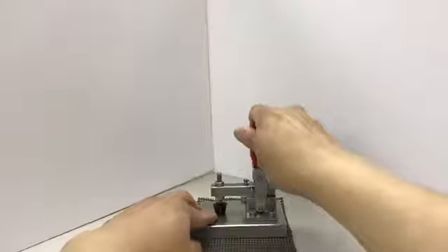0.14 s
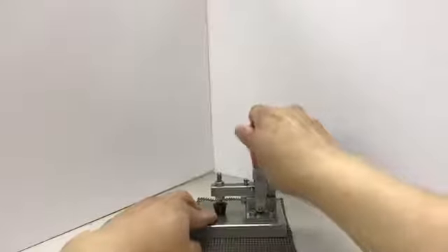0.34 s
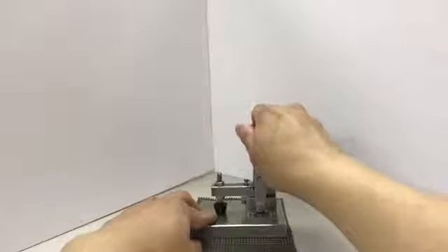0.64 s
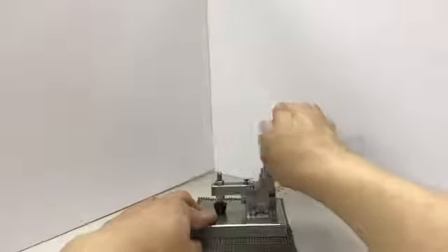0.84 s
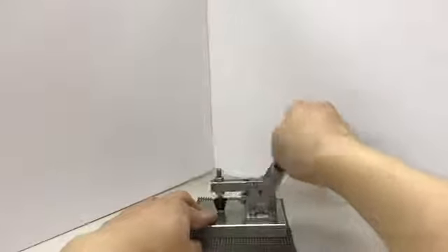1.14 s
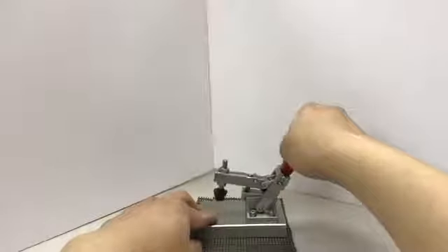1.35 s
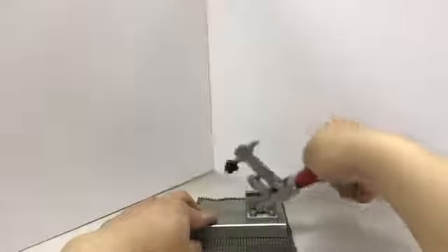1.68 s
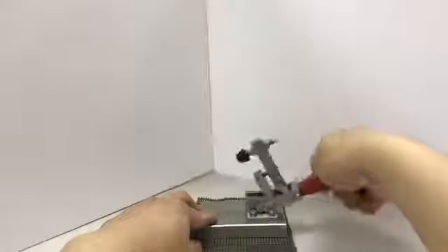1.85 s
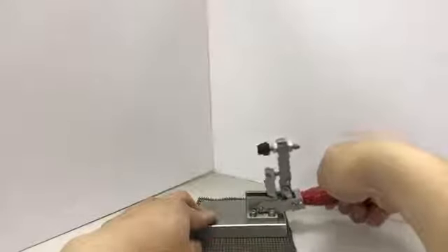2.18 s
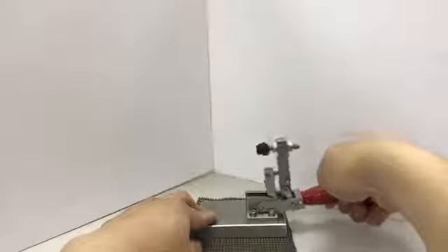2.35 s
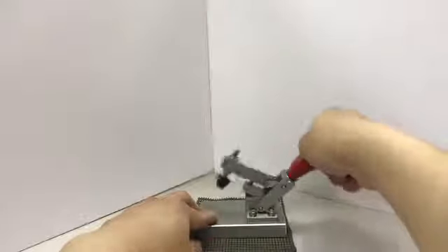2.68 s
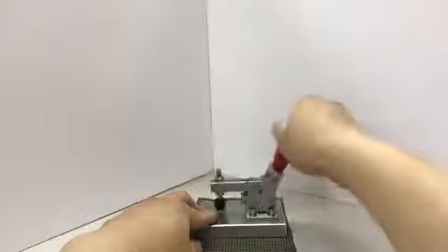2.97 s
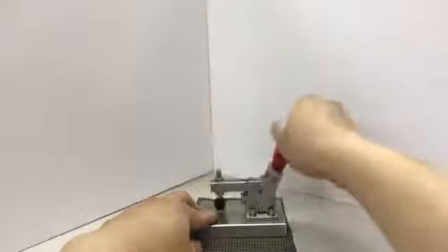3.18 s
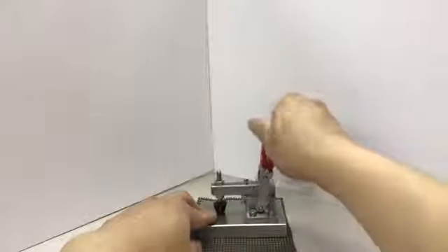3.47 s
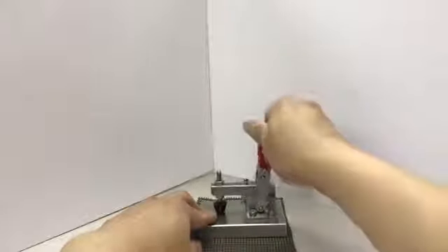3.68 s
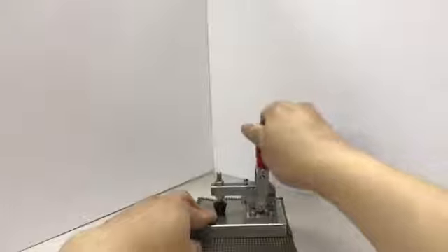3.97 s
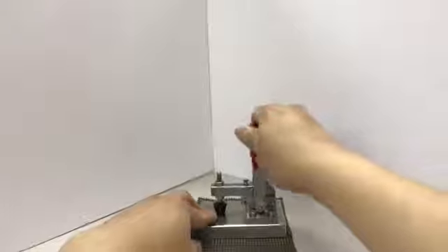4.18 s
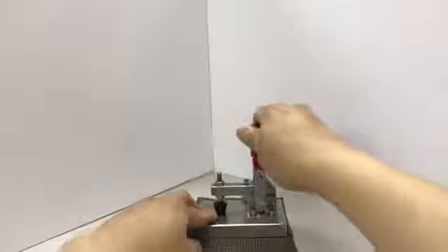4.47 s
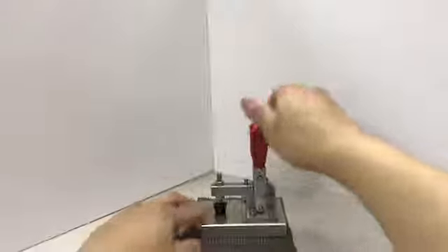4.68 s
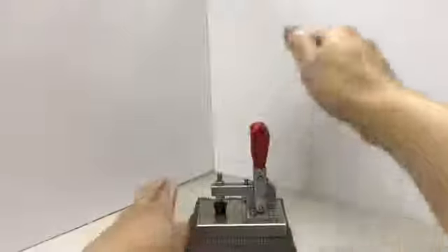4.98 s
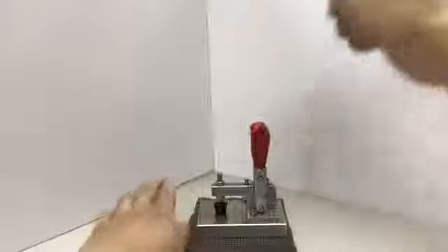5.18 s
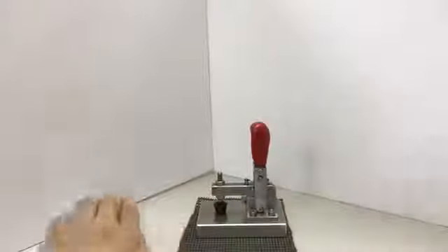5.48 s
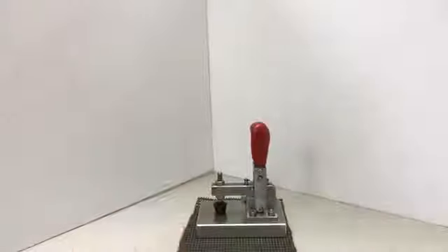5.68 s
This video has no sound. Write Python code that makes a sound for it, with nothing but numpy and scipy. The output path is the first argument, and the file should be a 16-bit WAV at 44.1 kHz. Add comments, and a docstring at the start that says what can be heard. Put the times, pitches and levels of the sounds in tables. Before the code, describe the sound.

A steel toggle clamp on a metal base snaps loudly, creaks and knocks as its handle swings, then snaps shut hard in a quiet room.

```python
"""In the corner of a small room, a steel toggle clamp on a metal base is worked by hand on a table.
It snaps open, the handle is swung back and forth with small knocks and ticks, and it snaps shut over centre.
Blows ring damped modes of base and table, with echoes and a diffuse tail; bright modes and a crack make the ticks.
Dry pivots drag in uneven slips and squeak as narrow noise; at the end the arms withdraw with a soft rustle.
Cloth and the still air of the room are shaped noise."""
import sys
import numpy as np
from scipy import signal
from scipy.fft import rfft, irfft
from scipy.io import wavfile

SR = 44100
rng = np.random.default_rng(int(sys.argv[2]) if len(sys.argv) > 2 else 0)


def dump(signal):
    """Clip the signal to [-1, 1] and save it as 16-bit WAV at the path in sys.argv[1]."""
    limited = np.clip(np.atleast_2d(signal).T, -1, 1)
    pcm = np.round(limited * 32767).astype(np.int16)
    wavfile.write(sys.argv[1], SR, pcm)


N = 257524
TIME = np.arange(N) / SR


def amp(db):
    """Turns decibels into a linear gain."""
    return 10 ** (np.asarray(db) / 20)


def evened(x):
    """Scales a sound to an rms of 1."""
    return x / np.sqrt(np.mean(x ** 2) + 1e-20)


def peaked(x):
    """Scales a sound to a peak of 1."""
    return x / abs(x).max()


def read(points, hz):
    """Joins (Hz, value) points on a log-frequency axis."""
    point_hz, value = np.transpose(points)
    return np.interp(np.log(hz + 1), np.log(point_hz + 1), value)


def add(mix, start_s, sound):
    """Mixes a sound in at its start time, cut off at the end of the scene."""
    part = mix[round(start_s * SR):][:len(sound)]
    part += sound[:len(part)]


def lowpass(x, hz, order=1):
    """Dulls a sound above a corner frequency."""
    return signal.sosfilt(signal.butter(order, min(hz, SR / 2 - 1), fs=SR, output="sos"), x)


def noise(spectrum):
    """Noise of rms 1 whose spectrum follows the given curve."""
    gain = amp(read(spectrum, np.fft.rfftfreq(N, 1 / SR)))
    return evened(irfft(rfft(rng.standard_normal(N)) * gain, N))


def ring(modes, t):
    """Sums decaying sines, one per mode; neighbours in the list start in opposite directions."""
    sound = 0
    for k, (hz, db, t60) in enumerate(modes):
        decay = np.exp(-np.log(1000) * t / t60)
        sound = sound + (-1) ** k * amp(db) * decay * np.sin(2 * np.pi * hz * t)
    return sound


def swell(start_s, hold_s, rise_s, fall_s):
    """The gain of one movement: full for hold_s; rise_s and fall_s are the times for a tenfold change."""
    early = np.maximum(start_s - TIME, 0)
    late = np.maximum(TIME - start_s - hold_s, 0)
    return np.exp(-np.log(10) * (early / rise_s + late / fall_s))


# The still room's tone. Each row: frequency in Hz, relative level in dB.
AIR_SPECTRUM = [(19, -27), (32, -2), (54, -3.5), (71, -5.5), (142, -1), (175, -6.5), (209, -4), (264, -13),
                (300, -16), (398, -13), (430, -27.5), (1200, -27), (1300, -28), (1440, -31), (15000, -45)]


def still_air(level_db=-56):
    """The quiet room under everything: steady noise, mostly low."""
    return amp(level_db) * noise(AIR_SPECTRUM)


# How long the diffuse room lasts. Each row: frequency in Hz, decay by 60 dB in seconds.
ROOM_DECAY_TIMES = [(100, 0.46), (400, 0.28), (800, 0.33), (2000, 0.3), (5000, 0.2), (14000, .15)]


def room(spectrum, build_s=0.007, bass_build_s=0.0088, bass_hz=450):
    """A diffuse tail that dies at its own speed in each band; the sparse bass modes take longest to build."""
    hz, t, grains = signal.stft(rng.standard_normal(SR), SR, nperseg=512)
    t60 = read(ROOM_DECAY_TIMES, hz)[:, None]
    decay = np.exp(-np.log(1000) * t / t60)
    decay = decay * np.sqrt(2 * np.log(1000) / (t60 * SR))  # unit energy in every band
    band_build_s = build_s + bass_build_s / (1 + (hz[:, None] / bass_hz) ** 4)
    build = 1 - np.exp(-(t / band_build_s) ** 2)
    colour = amp(read(spectrum, hz))[:, None]
    return signal.istft(grains * decay * build * colour, SR, nperseg=512)[1][:SR]


# Bending modes of the base on the table. Each row: frequency in Hz, relative level in dB, 60 dB decay in seconds.
BASE_MODES = [(80, -26, .2), (127, -6.5, .044), (180, 4.7, .031), (248, 5.8, .019), (343, .8, .008),
              (356, -10.4, .129), (390, -18, .16), (539, -2.9, .008), (558, -2, .016), (1035, -14.5, .011),
              (1945, -24.7, .012)]
# Higher modes of the base plate. Each row: frequency in Hz, relative level in dB, 60 dB decay in seconds.
PLATE_MODES = [(820, -28, 0.085), (905, -26.5, 0.057), (1280, -27.5, 0.041), (1630, -36, 0.052)]
# Reflections from table and walls. Each row: delay in seconds, gain at low frequencies.
EARLY_ECHOES = [(0.00266, 0.8), (0.00666, 0.48), (0.00952, 0.4), (0.01665, 0.09), (0.02482, 0.13),
                (0.03713, 0.16), (0.04537, 0.08)]
# The diffuse room after a blow on the base. Each row: frequency in Hz, relative level in dB.
BLOW_ROOM = [(80, 9.5), (160, 19.5), (300, 26.5), (400, 34), (520, 15), (650, 22), (850, 20.5),
             (1000, 12.5), (1200, 3.5), (1400, 0), (1900, -1.5), (2400, -12.5), (4000, -14.5),
             (7000, -33.5)]
# The room's standing wave: frequency in Hz, relative level in dB, 60 dB decay in seconds.
STANDING_WAVE = (140, -26.5, .47)


def thump(echo_hz=900):
    """The base's answer to one sharp blow, with dull early reflections, the standing wave and the diffuse tail."""
    t = np.arange(SR) / SR
    hz = np.fft.rfftfreq(SR, 1 / SR)
    echoes = sum(gain * np.exp(-2j * np.pi * hz * delay) for delay, gain in EARLY_ECHOES)
    echoes = echoes / (1 + (hz / echo_hz) ** 2)  # each echo is duller than the blow
    base = irfft(rfft(ring(BASE_MODES, t)) * (1 + echoes), SR)
    sound = base + ring(PLATE_MODES, t) + ring([STANDING_WAVE], t) + room(BLOW_ROOM)
    return sound[:SR * 3 // 4]


# Slow modes of the table under a heavy push.
# Each row: frequency in Hz, relative level in dB, 60 dB decay in seconds.
TABLE_MODES = [(61.6, -3.5, 0.037), (93, -0.5, 0.11), (141.8, -1.5, 0.06)]


def blows(rows, body):
    """Softer contacts last longer and so wake fewer of the high modes; heavy ones also rock the table."""
    out = np.zeros(N)
    sway = peaked(ring(TABLE_MODES, np.arange(len(body)) / SR))
    for start_s, peak_db, hard_hz, sway_db in rows:
        blow = peaked(lowpass(body, hard_hz, order=2))
        add(out, start_s, amp(peak_db) * blow + amp(sway_db) * sway)
    return out


# The linkage snapping over centre. Each row: start in seconds, peak of the blow in dB,
# hardness as the corner of the blow's spectrum in Hz, peak of the table sway in dB.
SNAP_BLOWS = [(.17105, -5.5, 3990, -23.5), (4.2808, -1.77, 3510, -45)]


def snaps(body):
    """The linkage snaps over centre and thumps base and table with a hard blow."""
    return blows(SNAP_BLOWS, body)


# Steel meeting steel. Each row: start in seconds, peak of the direct sound in dB, tilt in dB per octave
# (well above 2 kHz), pitch of the struck part in Hz, relative level of its ring in dB.
STEEL_TICKS = [(0.171, -26.5, -11.5, 1900, 5.5), (.587, -57, 5, 1880, 17), (0.9352, -38, 10.5, 9470, 3),
               (0.9904, -43.5, -6, 2500, 10), (1.355, -55, -2, 6000, -11), (2.649, -49, 7, 9600, 4),
               (3.031, -33.5, -6.5, 3670, 10), (3.033, -37.5, -5.5, 1120, 19.5),
               (3.0383, -43, -10, 6150, 15), (3.7197, -58, -10, 2940, 7), (4.2813, -27.5, -6, 6140, 10.5),
               (4.846, -41.5, 16, 12240, 2), (5.3555, -47, 19, 12700, -5)]
# Modes of the small steel links. Each row: frequency in Hz, relative level in dB, 60 dB decay in seconds.
LINK_MODES = [(2150, -12.5, .025), (2650, -2, 0.011), (3370, 5, 0.0092), (3970, -2.5, 0.013),
              (5740, 4.5, 0.0076), (6000, -5, 0.0068), (6790, -4, 0.02), (8860, -6, 0.028),
              (11700, -14, 0.03), (13700, -16, 0.013)]
# The room's answer to the ticks. Each row: frequency in Hz, level in dB against the direct sound.
TICK_ROOM_SPECTRUM = [(1000, -7), (1500, -3), (2000, -3), (2600, -9), (3700, -11), (6000, -15),
                      (14000, -14)]


def ticks(crack_db=-2, crack_s=0.0045, rise_s=0.00031, part_t60=.009):
    """A brief crack of contact and the short ring of the hand-damped links, with a faint room tail."""
    out = np.zeros(N)
    t = np.arange(SR // 20) / SR
    hz = np.fft.rfftfreq(len(t), 1 / SR)
    for start_s, peak_db, tilt_db, part_hz, part_db in STEEL_TICKS:
        crack = rng.standard_normal(len(t)) * np.exp(-t / crack_s)
        crack = crack - lowpass(crack, 1500)  # only the bright part
        steel = ring(LINK_MODES + [(part_hz, part_db, part_t60)], t)
        sound = (steel + amp(crack_db) * crack) * (1 - np.exp(-t / rise_s))
        tilt = amp(tilt_db * np.log2(1 + hz / 2000))
        sound = irfft(rfft(sound) * tilt, len(t))[:len(t) * 3 // 4]
        add(out, start_s, amp(peak_db) * peaked(sound))
    return out + signal.fftconvolve(out, room(TICK_ROOM_SPECTRUM, build_s=0.0022))[:N]


def off_centre(body, node_hz=580, node_q=0.91, depth=0.51):
    """Blows away from the over-centre stop land near a node of the middle modes and wake them less."""
    return body - depth * signal.lfilter(*signal.iirpeak(node_hz, node_q, fs=SR), body)


# The pad landing, play in the joints, shifts of the hand. Each row: start in seconds, peak of the blow in dB,
# hardness as the corner of the blow's spectrum in Hz, peak of the table sway in dB.
HANDLING_KNOCKS = [(.508, -41.5, 1200, -60), (.587, -47, 1400, -72), (.668, -47, 900, -62),
                   (.953, -32, 1110, -41), (.970, -36.5, 1000, -38), (1.022, -42, 1400, -44),
                   (1.142, -38.5, 1300, -48), (1.256, -34.5, 307, -27), (1.377, -41, 1190, -42),
                   (1.622, -50.5, 1100, -44), (1.676, -41, 344, -48), (1.808, -41.5, 338, -43.5),
                   (1.988, -41.5, 352, -71), (2.025, -41, 343, -51), (2.104, -40, 348, -51),
                   (2.2535, -33.5, 456, -35.5), (2.337, -29, 730, -38), (2.655, -41.5, 493, -75),
                   (3.0312, -17.5, 654, -32), (3.407, -41.5, 400, -64), (3.7198, -36.5, 846, -57),
                   (5.314, -41, 203, -62)]


def knocks(hinge):
    """Small, mostly softer contacts knock the base away from the over-centre stop."""
    return blows(HANDLING_KNOCKS, hinge)


# Dry pivots dragging, one row for each push on the handle.
# Each row: start in seconds, hold in seconds, level in dB before the overall drag trim.
PIVOT_DRAGS = [(0.529, 0.019, -46.5), (.68, 0.072, -55), (1.17, 0.13, -46), (1.388, 0.023, -46),
               (1.609, 0.14, -47), (1.947, 0.23, -51), (2.192, 0.093, -42.5)]


def drag(hinge, slips_per_s=70, hard_hz=260, trim_db=-4, rise_s=0.055, fall_s=0.057):
    """The pivots stick and slip at uneven intervals, each slip nudging the base."""
    pace = rng.exponential(1, N // 512 + 1).repeat(512)[:N]  # a new speed every 512 samples
    travel = np.cumsum(pace) * slips_per_s / SR
    slips = np.diff(np.floor(travel), prepend=0) * rng.uniform(0.25, 1, N)
    rumble = evened(lowpass(signal.oaconvolve(slips, hinge)[:N], hard_hz, order=2))
    pushes = sum(amp(db) * swell(start_s, hold_s, rise_s, fall_s) for start_s, hold_s, db in PIVOT_DRAGS)
    return amp(trim_db) * rumble * pushes


def squeak(start_s, hold_s, db, pitch_hz, width_hz, rise_s=0.016, fall_s=0.043, sag_oct_per_s=0.45):
    """Friction sings in one resonance, narrow noise around a pitch that sags as the load eases."""
    hz = pitch_hz * 2 ** (-sag_oct_per_s * np.maximum(TIME - start_s, 0))
    flutter = lowpass(rng.standard_normal(N) + 1j * rng.standard_normal(N), width_hz, order=2)
    tone = evened((flutter * np.exp(2j * np.pi * np.cumsum(hz) / SR)).real)
    return amp(db) * swell(start_s, hold_s, rise_s, fall_s) * tone


# The pivot creaking, grating and squeaking. Each row: start in seconds, hold in seconds, level in dB,
# pitch at the start in Hz, width of the band to either side in Hz.
PIVOT_SQUEAKS = [(0.931, 0.057, -42.5, 296.5, 64.7), (0.943, .035, -65.5, 1432, 500),
                 (1.233, .015, -73, 3050, 350), (1.384, 0.064, -80, 4560, 200),
                 (1.478, 0.013, -69, 4340, 45)]


def squeaks():
    """All the moments when the pivot's friction sings, from low creak to thin squeak."""
    return sum(squeak(*row) for row in PIVOT_SQUEAKS)


# Cloth sliding, one row for each move as the arms relax and withdraw. Each row: start in seconds,
# hold in seconds, rise in seconds, fall in seconds, soft rub in dB, fine hiss in dB.
CLOTH_MOVES = [(4.304, 0.36, 0.014, 0.02, -65.5, -69.5), (4.818, 0.014, .1, .16, -71, -71.5),
               (5.161, 0.19, 0.57, 0.12, -58, -64), (5.181, 0.008, 0.099, 0.14, -52, -63.5),
               (5.357, 0.0084, 0.019, 0.032, -52.5, -51), (5.528, 0.14, 0.14, 0.065, -63, -46)]
# Tone of the soft rub. Each row: frequency in Hz, relative level in dB.
RUB_SPECTRUM = [(150, 4.5), (400, -0.5), (900, -1), (1500, -2), (3500, -4.5), (6500, -7.5), (10000, -18),
                (15000, -44)]
# Tone of the fine hiss. Each row: frequency in Hz, relative level in dB.
HISS_SPECTRUM = [(600, -48.5), (1200, -10), (4000, -8), (7000, -3.5), (9000, -2.5), (10500, -5), (12800, 1),
                 (15000, -5.5)]


def cloth():
    """A soft rub and a fine hiss swell with each move and share the slight grain of the weave."""
    grain = amp(.8 * evened(lowpass(rng.standard_normal(N), 150, order=2)))  # 0.8 dB rms flicker
    rub, hiss = noise(RUB_SPECTRUM), noise(HISS_SPECTRUM)
    out = np.zeros(N)
    for start_s, hold_s, rise_s, fall_s, rub_db, hiss_db in CLOTH_MOVES:
        out += swell(start_s, hold_s, rise_s, fall_s) * (amp(rub_db) * rub + amp(hiss_db) * hiss)
    return grain * out


def scene():
    """The clamp, the cloth and the still room."""
    body = thump()
    hinge = off_centre(body)
    clamp = snaps(body) + ticks() + knocks(hinge) + drag(hinge) + squeaks()
    return (still_air() + clamp + cloth())[None]


def record(dry, bass_hz=43, edge_hz=15200):
    """The microphone's bass roll-off and the recorder's band limit."""
    dry = signal.sosfilt(signal.butter(4, bass_hz, "high", fs=SR, output="sos"), dry)
    band_limit = signal.firwin(511, edge_hz, window=("kaiser", 8), fs=SR)
    return signal.oaconvolve(dry, band_limit[None], "same")


dry = scene()
out = record(dry)
dump(out)
```